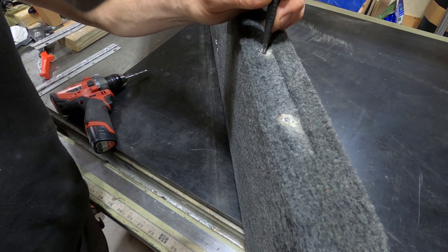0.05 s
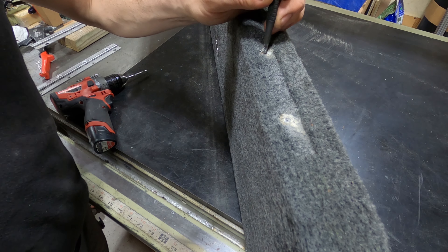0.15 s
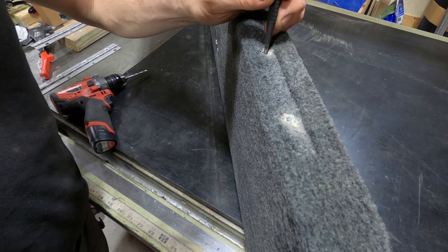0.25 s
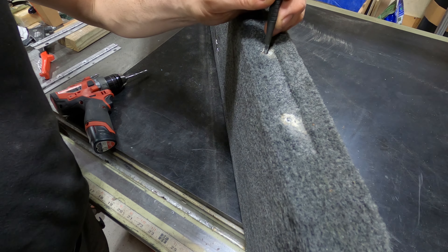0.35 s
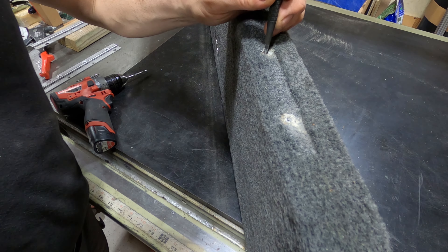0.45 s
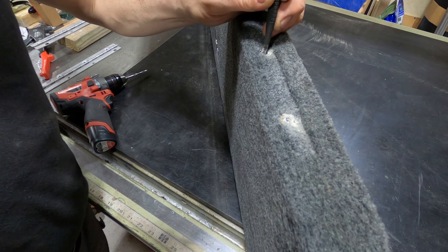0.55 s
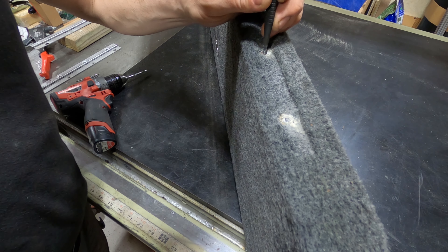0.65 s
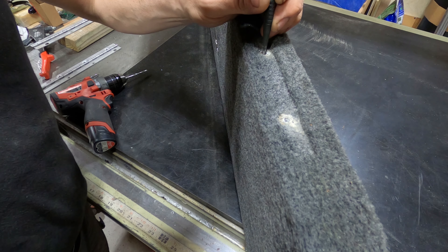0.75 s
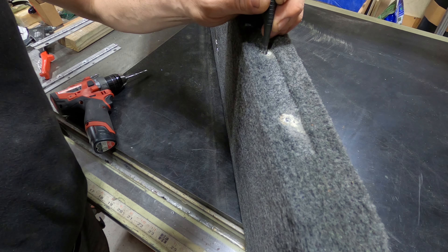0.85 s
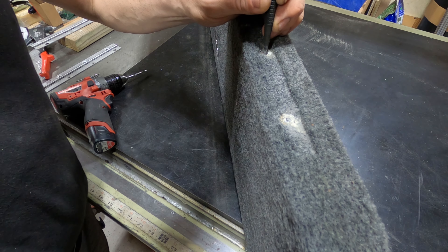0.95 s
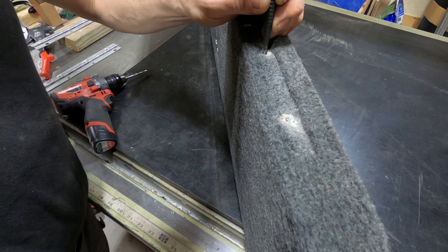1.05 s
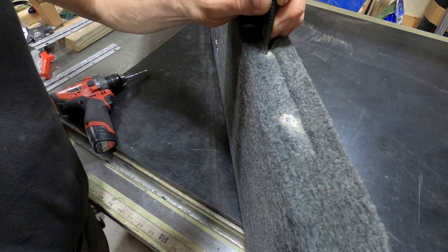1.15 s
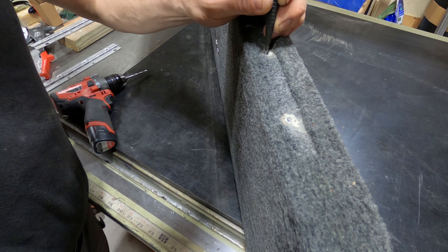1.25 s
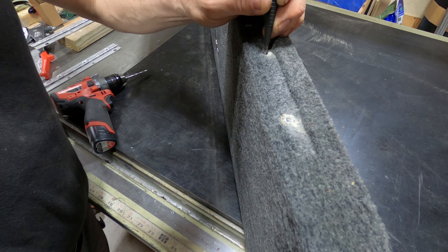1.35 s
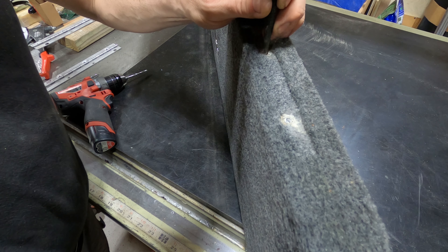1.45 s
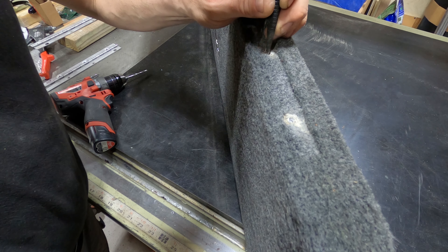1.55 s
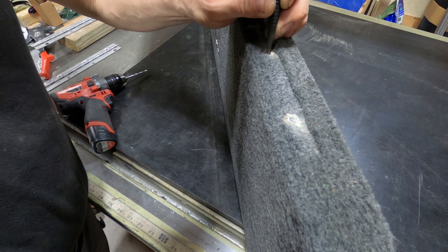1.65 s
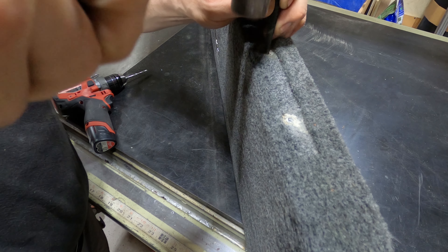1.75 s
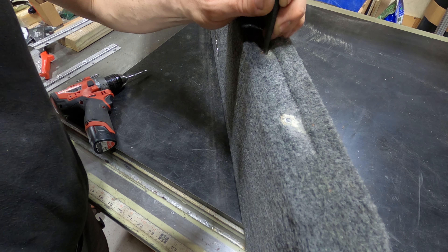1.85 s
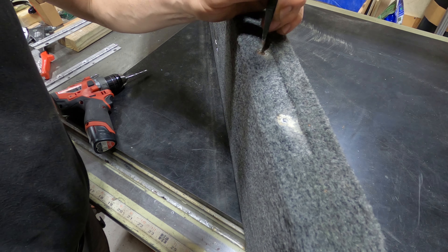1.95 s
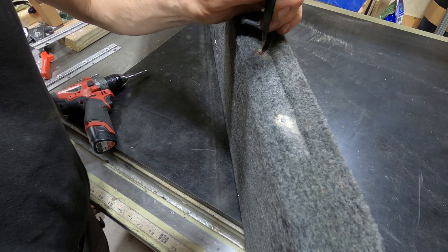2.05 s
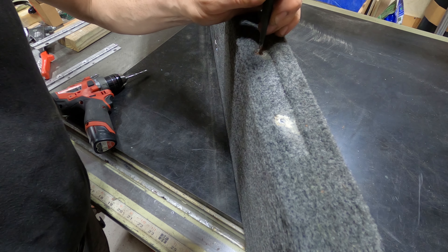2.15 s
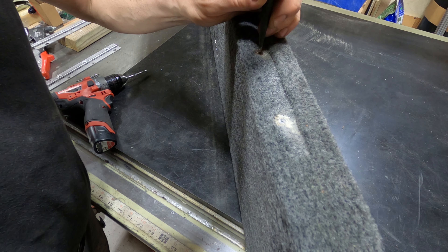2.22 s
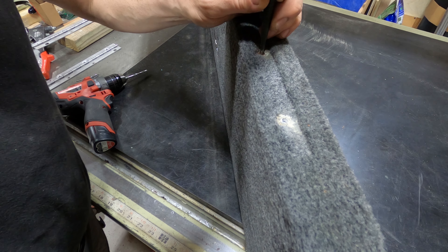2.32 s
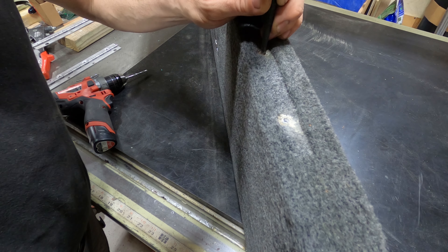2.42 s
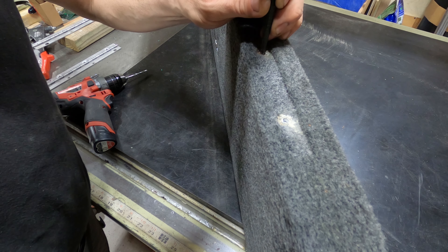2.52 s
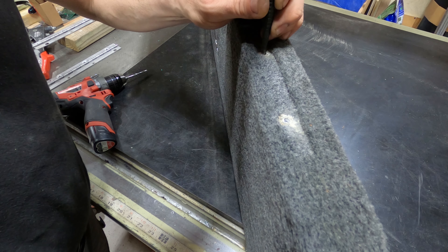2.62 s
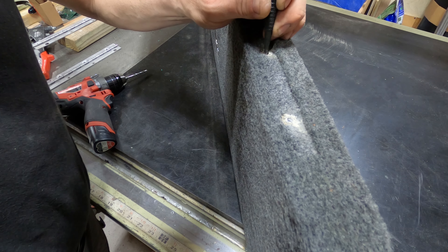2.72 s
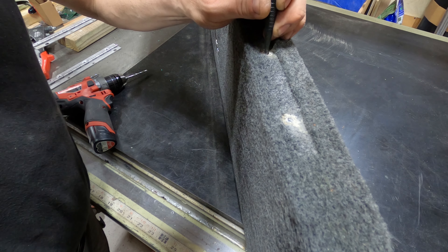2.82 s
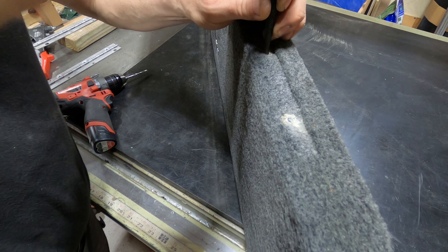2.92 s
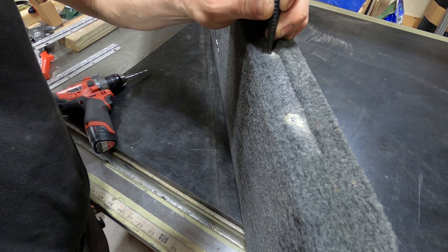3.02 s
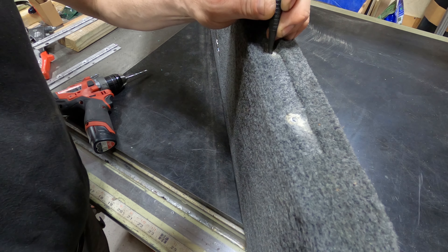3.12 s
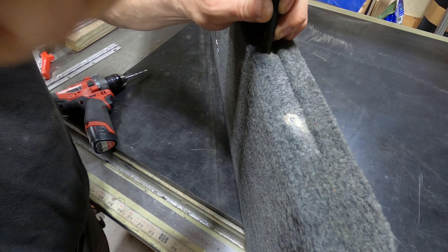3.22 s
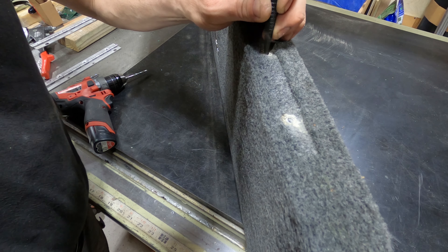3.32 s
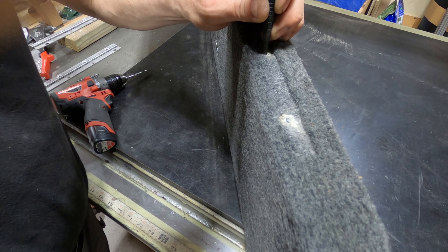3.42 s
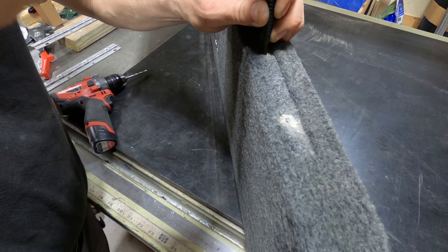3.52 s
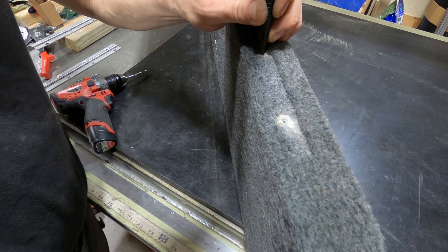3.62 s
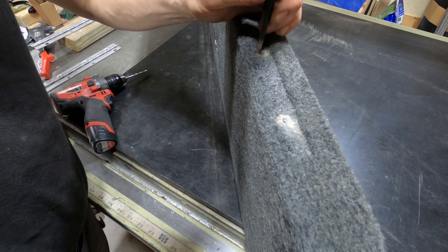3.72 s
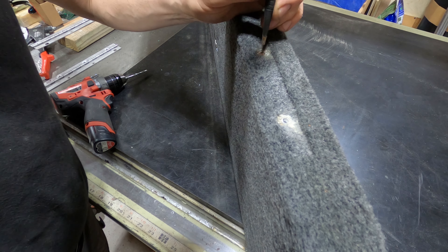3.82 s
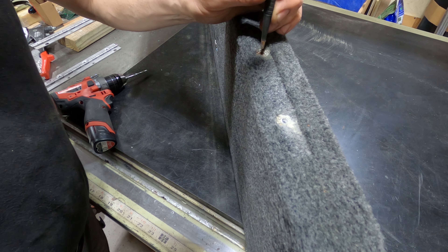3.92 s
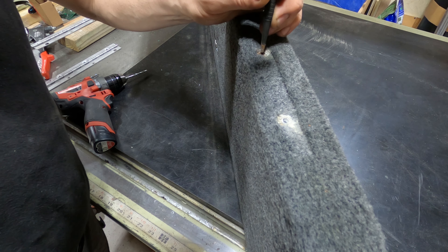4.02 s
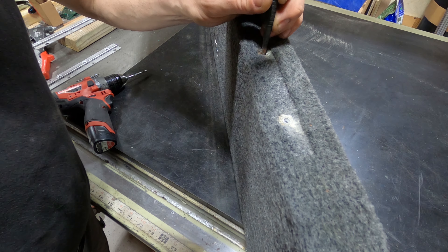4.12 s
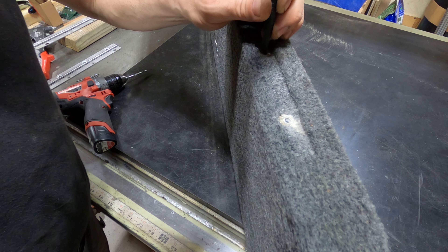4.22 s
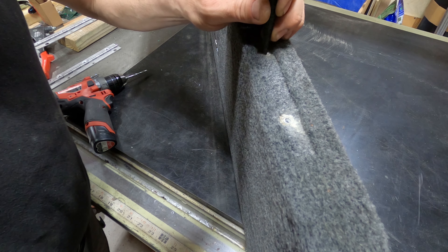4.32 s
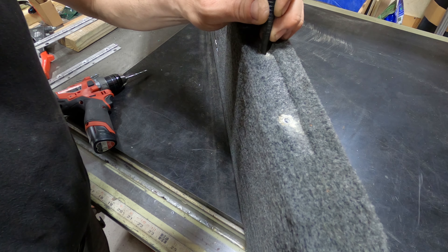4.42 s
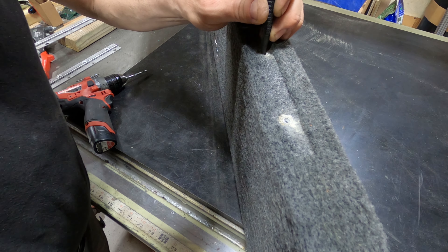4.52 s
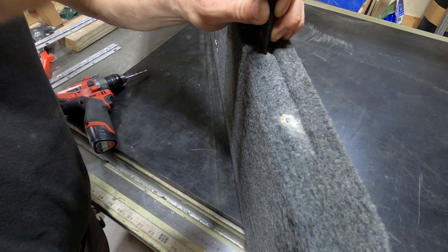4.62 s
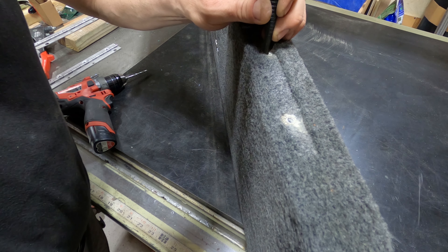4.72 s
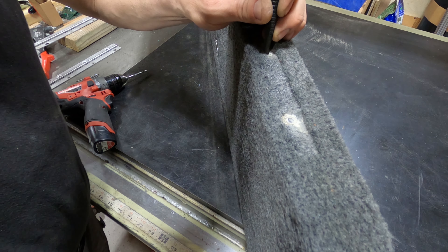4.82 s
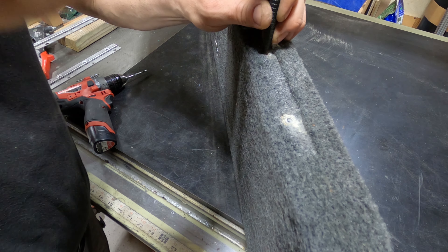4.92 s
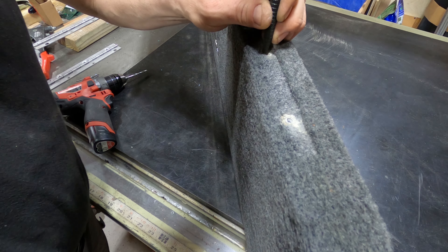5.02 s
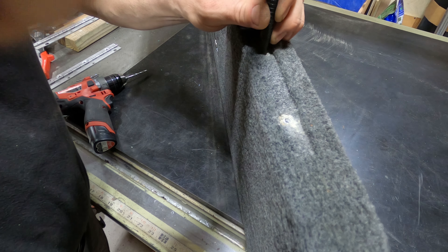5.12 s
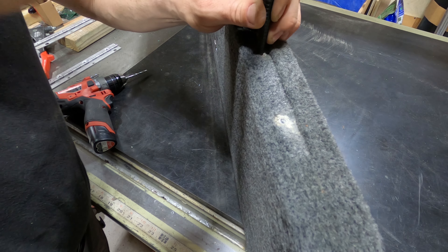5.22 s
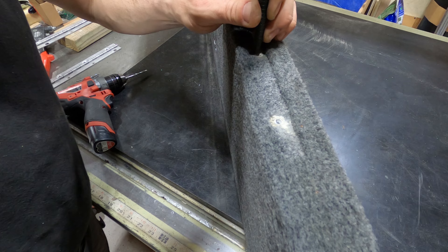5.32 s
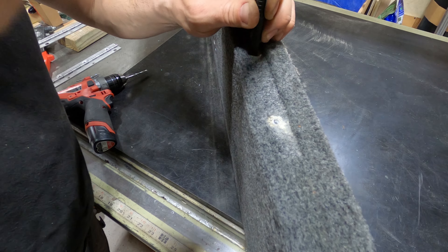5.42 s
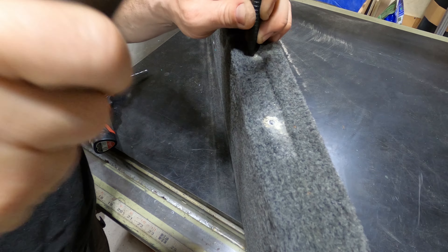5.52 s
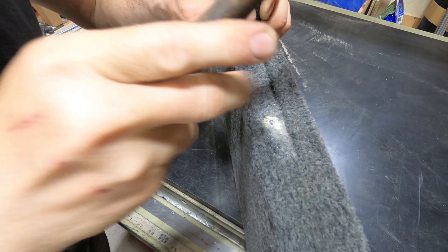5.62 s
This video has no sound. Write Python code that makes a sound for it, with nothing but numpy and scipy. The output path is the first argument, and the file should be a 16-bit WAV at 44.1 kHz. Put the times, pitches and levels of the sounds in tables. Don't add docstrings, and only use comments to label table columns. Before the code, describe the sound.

Nine sharp steel taps, three at a time, with dull hull boom and brief room hiss, quiet scrapes and ticks between the sets.

```python
import sys
import numpy as np
from scipy import signal
from scipy.fft import rfft, irfft, next_fast_len
from scipy.io import wavfile
from scipy.ndimage import uniform_filter1d

SR = 44100
rng = np.random.default_rng(int(sys.argv[2]) if len(sys.argv) > 2 else 0)


def master(y):
    cut = np.clip(np.atleast_2d(y).T, -1, 1)
    pcm = np.round(cut * 32767)
    wavfile.write(sys.argv[1], SR, pcm.astype(np.int16))


def level_to_linear(level):
    exponent = np.asarray(level, float) / 20
    return 10 ** exponent


N = 249591
HOP_S = 512 / 48000

# [t/s, crack peak level/dB, lid knock level/dB, shank ring level/dB, shank ring f/Hz]
BLOWS = [
    (1.211, -4.5, 1.5, 0.5, 7450),
    (1.5344, 0.5, -6.5, -8.5, 7944),
    (1.8261, 0.5, 0, -10.5, 8060),
    (3.017, -1.5, 3.5, 15, 7813),
    (3.3343, 0.5, 2.5, 8.5, 7840),
    (3.5742, 2, -2.5, 3, 6894),
    (4.7066, 1, 5.5, 5, 8455),
    (5.006, 2.5, -4.5, -9.5, 9160),
    (5.2747, 0, -6.5, -5, 8450),
]
# [head ring f/Hz, head ring level/dB, room level/dB, hand damping of the lid, room brightness/dB per octave]
GRIPS = [
    (2600, -7, -25, 1.02, 0.47),
    (3610, -0.1, -21.5, 0.75, 0.82),
    (2890, 13, -20.5, 0.86, -1.57),
]
# [place/hops, smear level/dB, first early copy level/dB]
LEADS = [(1.12, -19.5, -18.5), (1.34, -29, -14.5), (1.55, -42, -18.5)]
# [f/Hz, level/dB per Hz]
CRACK_COLOUR = [(410, -25.5), (700, 3), (1460, -5.5), (3110, -3), (3890, 1.5), (5690, -7), (7030, -5.5),
                (9400, -8), (10400, -21.5), (12200, -13.5), (16400, -43)]
# [f/Hz, level/dB, t60/s]
HULL_MODES = [(49.03, -16, 1), (57.3, 5.5, 0.36), (71.6, -0.5, 0.51), (106.7, -2.5, .3), (132.7, 4, 0.33),
              (145.66, -6, 0.58), (206, -9, 0.48), (232.2, -4, 0.33), (263, -1.5, 0.05), (320.6, -13, 0.44),
              (368.5, -7.5, 0.3), (419.4, -6, 0.13), (488, -7, 0.043), (516, -26.5, 0.45), (606, -22, 0.29),
              (757.3, -19.5, 0.17)]
# [f/Hz, level/dB per Hz]
ROOM_COLOUR = [(150, -20), (250, -6.5), (374, -8.5), (469, -10), (1050, -22), (1270, -17.5), (1840, -26.5),
               (2890, -23), (6820, -31.5), (8120, -30.5), (13000, -40), (14700, -47.5), (16400, -109)]
# [f/Hz, t60/s]
ROOM_DECAY = [(300, 0.41), (1000, 0.27), (3000, 0.4), (8000, 0.46), (12000, 0.29), (14500, .4)]
# [t/s, knock rms level/dB, thud level/dB, t60/s]
REBOUNDS = [
    (1.243, -32, -25, .06),
    (3.703, -37, -24.5, 0.28),
    (3.801, -50.5, -47, 0.36),
    (4.822, -35.5, -24.5, 0.27),
    (5.127, -32, -26, 0.27),
    (5.386, -37.5, -34, 0.21),
]
# [t/s, knock level/dB, thud level relative to the knock/dB, click level relative to
# the knock/dB, knock t60/s]
TOUCHES = [(0.109, -58, -19, -6, .03), (0.417, -62, -7, -30, .03), (0.514, -87, -8, 13, 0.092),
           (0.541, -86, -7, 12, 0.07), (0.616, -72, -13, 23.5, 0.17), (0.667, -42, -16, -18, 0.048),
           (0.804, -50, -27, -16, 0.031), (0.85, -36, -13, -28, 0.093), (2.545, -66.5, 10.5, -20, .1),
           (2.616, -49.5, 0, -35, 0.14), (4.385, -37, -9, -16, 0.038), (4.473, -63, -7, -16, 0.12)]
# [start t/s, end t/s, scrape level at the end/dB, swell level/dB, rub level at the end/dB]
DRAGS = [
    (0.0, 0.004, -65.5, 18, -94),
    (0.105, 0.312, -69, -0.5, -73.5),
    (0.61, 0.815, -65.5, 4, -84),
]
# [start t/s, end t/s, scrape level at the end/dB, swell level/dB, rub level at the end/dB]
SEATS = [
    (2.48, 2.62, -65.5, 35, -70),
    (4.22, 4.39, -58.5, 40, -60.5),
]
# [f/Hz, width/Hz, level/dB]
SCRAPE_MODES = [(2180, 840, 5.5), (3990, 730, 4), (6080, 1500, 6), (8860, 1200, -5)]
# [f/Hz, width/Hz, level/dB]
SEAT_MODES = [(2740, 230, 7.5), (3750, 600, 1.5), (8800, 250, -5)]
# [t/s, hull rumble level under shifting weight/dB, suppressor opening level/dB]
QUIET = [
    (0.0, -73, 2.5),
    (0.28, -68.5, -1),
    (0.46, -73, -1),
    (0.84, -67, 2.5),
    (1.17, -60, -1),
    (2.299, -75, -6),
    (2.95, -73, -3.5),
    (4.2, -75.5, -0.5),
    (4.66, -65, -2.5),
]
# [f/Hz, level/dB per Hz]
RUMBLE_COLOUR = [(12, -22), (24, 6.5), (45, 3.5), (70, -15.5), (100, -19.5), (130, -48)]
HUM_COLOUR = [(80, -40.5), (140, -0.5), (210, -2), (380, -9.5), (520, -15), (800, -56)]
HISS_COLOUR = [(450, -34.5), (700, -1), (1400, 1.5), (2000, -8), (4000, -16.5), (9500, -28), (10500, -35),
               (12000, -56), (16400, -90.5)]
# [level/dB, fall/dB per s]
AFTER = [(-39.5, 63), (-39.5, 74), (-52.5, 81.5)]
# [f/Hz, side over mid level/dB]
SIDE_COLOUR = [(60, -20), (500, -9.5), (2000, -8.5), (8000, -2), (11000, -6), (12000, -2.5), (15000, -11.5)]
# [t/s, width level/dB]
WIDTH = [
    (0, 5),
    (1.15, 3.5),
    (1.851, -1.5),
    (1.9, -6),
    (2.199, -17.5),
    (4.6, -16),
    (4.9, -11.5),
    (5.05, -12.5),
    (5.66, -5),
]
# [f/Hz, level/dB per Hz]
KNOCK_COLOUR = [(300, -57.5), (700, -30), (1450, 14), (2000, 2), (2900, 3.5), (4000, -11), (6000, -120)]
CLICK_COLOUR = [(2000, -120), (2800, -53), (3800, 12.0), (5000, 19), (6000, -8), (9000, 5), (11000, -38),
                (13000, -120)]
DRAG_COLOUR = [(1200, -26), (1800, 7.5), (10000, 1.0), (12500, 6), (14000, -120)]
RUB_COLOUR = [(200, -18), (400, 4.5), (1400, -4.5), (2000, -5.5), (3000, -59)]
REBOUND_COLOUR = [(150, -41.5), (350, 4.5), (700, -7.0), (1100, -6.0), (1700, -12), (2100, -19.0), (3600, -16.5),
                  (5000, -31), (7000, -120)]


def unit(x):
    return x / np.sqrt(np.mean(x ** 2) + 1e-20)


def along(points, hz):
    f, v = np.transpose(points)
    return np.interp(np.log(hz + 1), np.log(f + 1), v)


def filtered(x, response):
    m = next_fast_len(x.shape[-1] + 4096)
    spectrum = rfft(x, m) * response(np.fft.rfftfreq(m, 1 / SR))
    return irfft(spectrum, m)[..., :x.shape[-1]]


def peak(f, hz, width_hz):
    return 1j * f * width_hz / (hz * hz - f * f + 1j * f * width_hz)


def noise(count, colour):
    white = rng.standard_normal((2, count))
    pair = filtered(white, lambda f: level_to_linear(along(colour, f) + [0 * f, along(SIDE_COLOUR, f)]))
    return pair / np.sqrt(np.mean(pair[0] ** 2))


def add(out, x, s):
    part = out[:, round(s * SR):][:, :x.shape[-1]]
    part += x[..., :part.shape[1]]


def patchy(x, depth_db, size):
    z = signal.stft(x, nperseg=1024)[2]
    field = uniform_filter1d(rng.standard_normal(z.shape[1:]), size[0], axis=0)
    field = uniform_filter1d(field, size[1], axis=1)
    return signal.istft(z * level_to_linear(depth_db * unit(field)), nperseg=1024)[1][:, :N]


def shop():
    hum_db, hiss_db, hiss_depth = -70, -78, 2.3
    t = np.arange(N + 1024) / SR
    s, rumble_db, open_db = np.transpose(QUIET)
    open_db = np.interp(t, s, open_db)
    rest = np.interp(t, s, rumble_db), hum_db + open_db, hiss_db + hiss_depth * open_db
    hits = np.r_[-9, np.transpose(BLOWS)[0]]
    since = t - hits[np.searchsorted(hits, t) - 1]
    x = 0
    for db, (after_db, fall), colour in zip(rest, AFTER, (RUMBLE_COLOUR, HUM_COLOUR, HISS_COLOUR)):
        x = x + np.hypot(level_to_linear(db), level_to_linear(after_db - fall * since)) * noise(len(t), colour)
    return patchy(x, 2.8, size=(3, 6))


def slides():
    start_s, rub_slope, rub_under_db = 0.02, 150, -30
    out, t = np.zeros((2, N)), np.arange(N) / SR
    grain = level_to_linear(1.5 * unit(uniform_filter1d(rng.standard_normal(N), 150)))
    raw = patchy(noise(N, DRAG_COLOUR) * grain, 3.7, size=(7, 6))
    rub = noise(N, RUB_COLOUR)
    for rows, modes, valley, stop in ((DRAGS, SCRAPE_MODES, .22, 260), (SEATS, SEAT_MODES, .16, 1100)):
        scrape = filtered(raw, lambda f: valley + sum(level_to_linear(db) * np.abs(peak(f, hz, w)) ** 2 for hz, w, db in modes))
        scrape = scrape / np.std(scrape[0])
        for start, end, db, swell_db, rub_db in rows:
            moving = np.clip((t - start) / start_s + (start < start_s), 0, 1)
            to_go = np.clip((end - t) / (end - start), 0, 1)
            level = moving * level_to_linear(db - swell_db * to_go - stop * np.maximum(t - end, 0))
            rubbing = level_to_linear(rub_under_db) * level + moving * level_to_linear(rub_db - rub_slope * np.abs(t - end))
            out += level * scrape + rubbing * rub
    return out


def boom(t, spread_db, damp, knock_db, panel_db=0):
    hz, db, t60 = np.transpose(HULL_MODES)[:, :, None]
    chance = rng.standard_normal((2, len(HULL_MODES), 1))
    db = db + spread_db * chance[0] + knock_db * np.clip(np.log2(hz / 200), 0, 1)
    face = np.where((hz > 100) & (hz < 170), -1, 1)
    db = db + panel_db * ((hz > 100) & (hz < 250))
    t = np.maximum(t - .23 / hz, 0)
    rise = 1 - np.exp(-t * hz / 0.13)
    decay = level_to_linear(db - 60 * t * np.where(hz > 100, damp, 1) / t60)
    tone = np.sin(2 * np.pi * hz * (1 + 0.016 * chance[1]) * t)
    return np.sum(face * rise * decay * tone, axis=0)


def thud(t, spread_db, damp, knock_db):
    return filtered(boom(t, spread_db, damp, knock_db), lambda f: f / (f + 300)) * [[1], [.05]]


def touches():
    out, t = np.zeros((2, N)), np.arange(round(.2 * SR)) / SR
    for s, db, thud_db, click_db, t60 in TOUCHES:
        snap = (1 - np.exp(-t / .0003)) * level_to_linear(-60 * t / .012)
        knock = (snap + level_to_linear(-29.0 - 60 * t / max(t60, .01))) * noise(len(t), KNOCK_COLOUR)
        click = (snap + level_to_linear(-11 - 60 * t / 0.098)) * noise(len(t), CLICK_COLOUR)
        add(out, level_to_linear(db - 2.5) * (knock + level_to_linear(click_db) * click), s)
        add(out, level_to_linear(db + thud_db - 9.5) * thud(t, 5.7, 1.0, 11.0), s)
    return out


def crack_of_steel(t, db, wide_db, head, shank):
    def rings(f):
        ringing = 1 + level_to_linear(head[1]) * peak(f, head[0], 700) + level_to_linear(shank[1]) * peak(f, shank[0], 520)
        return ringing * f * f / (f * f + 1100 ** 2)

    burst = filtered(noise(4000, CRACK_COLOUR), rings)[:, 2000:2700] * level_to_linear([[0], [wide_db + 2.5]])
    decay = level_to_linear(-60 * t / .0025) + level_to_linear(-5 - 60 * t / .0075) + level_to_linear(-26 - 60 * t / .04)
    crack = burst * (1 - np.exp(-t / .0003)) * decay
    crack = level_to_linear(db - 0.5) * crack / np.abs(crack[0]).max()
    top = filtered(crack[0], lambda f: np.clip(f / 2000 - 5, 0, 1))
    return crack - .5 * top * [[0], [1]]


def room(seconds, ring_hz, ring_db, bright_db):
    hz, t, z = signal.stft(noise(round(seconds * SR), ROOM_COLOUR), SR, nperseg=256)
    duck = 8 * np.exp(-t / 0.04)
    cut = 90 * t ** 2 * np.log(1 + hz / 1500)[:, None]
    fall = -60 * t / along(ROOM_DECAY, hz)[:, None] - duck - cut
    ring = 1 + level_to_linear(ring_db) * np.abs(peak(hz, ring_hz, 1200)) ** 2
    ring = ring * level_to_linear(bright_db * np.log2(hz / 3000 + 0.14))
    hiss = signal.istft(z * level_to_linear(fall) * ring[:, None], SR, nperseg=256)[1]
    return filtered(hiss, lambda f: np.clip((15600 - f) / 2500, 0, 1))


def smear(leaks):
    t = np.arange(round(4 * HOP_S * SR)) / SR - 4 * HOP_S
    hz, db = np.transpose(leaks)
    crowd = rng.uniform(450, 13000, size=36)
    crowd_db = along(CRACK_COLOUR, crowd) + rng.normal(-9, 3.2, size=36) - 8 * (crowd < 2500)
    db, hz = np.r_[db, crowd_db], np.r_[hz, crowd][:, None]
    turn = rng.random((2, len(hz), 1))
    swell = 1 + 0.28 * np.cos(2 * np.pi * (t / HOP_S + turn[0]))
    lines = level_to_linear(db) @ (swell * np.sin(2 * np.pi * (hz * t + turn[1])))
    return unit(lines) * level_to_linear(995 * t - 5200 * t ** 2)


def hammer():
    boom_db = -17.8
    out, t = np.zeros((2, N)), np.arange(round(.6 * SR)) / SR
    short, fifth = t[:700], t[:SR // 5]
    place, *lead = np.transpose(LEADS)
    for blow, (s, db, knock_db, shank_db, shank_hz) in enumerate(BLOWS):
        head_hz, head_db, room_db, damp, bright_db = GRIPS[blow // 3]
        room_db += 0.22 * min(knock_db, 0)
        wide_db = -5 - 1.1 * knock_db
        bright_db -= .12 * shank_db
        panel_db = -0.9 if blow else -9
        smear_db, copy_db = (np.interp(s / HOP_S % 2, place, column) for column in lead)

        crack = crack_of_steel(short, db, wide_db, (head_hz, head_db), (shank_hz, shank_db))
        low = level_to_linear(boom_db - 2) * boom(t, 2.5, damp, knock_db * np.exp(-t / 0.19), panel_db)
        dent = t / 0.0015 * level_to_linear(-60 * t / 0.015) * np.cos(2 * np.pi * 400 * t)
        low += level_to_linear(boom_db + knock_db + 9.5) * dent
        sway = level_to_linear(boom_db + wide_db - 17.0) * level_to_linear(-60 * fifth / .25) * boom(fifth, 5, 1.6, 3)
        add(out, crack, s + .0008)
        add(out[:1], low, s + 0.0017)
        add(out[1:], sway, s + 0.0017)
        add(out, level_to_linear(room_db) * room(.55, shank_hz, 0.51 * shank_db, bright_db), s + .003)

        leak = smear([(shank_hz, 0.4 * shank_db), (1.1 * head_hz, -4.5)])
        add(out, level_to_linear(db + smear_db) * leak * [[1], [0]], s + 0.00055 - 4 * HOP_S)
        early = crack + 2.5 * low[:700] * level_to_linear(-60 * short / .02) * [[1], [0]]
        for k in range(1, 5):
            add(out, early * level_to_linear(copy_db - 14 * (k - 1)), s + .0008 - k * HOP_S)
    return out


def rebounds():
    out, t = np.zeros((2, N)), np.arange(round(.25 * SR)) / SR
    for s, knock_db, thud_db, t60 in REBOUNDS:
        shape = (1 - np.exp(-t / .0008)) * (level_to_linear(-60 * t / t60) + 0.27 * level_to_linear(-60 * t / 0.015))
        add(out, level_to_linear(knock_db) * shape * noise(len(t), REBOUND_COLOUR), s)
        add(out, level_to_linear(thud_db) * thud(t, 4.5, 1.57, 9.4), s + 0.002)
    return out


def gate(x):
    gate_db, soft_db, gate_hz = -103, 8, 10300
    hz, _, z = signal.stft(x, SR, nperseg=512)
    power = uniform_filter1d(np.mean(np.abs(z) ** 2, axis=0), size=9, axis=0)
    power = uniform_filter1d(power, size=5, axis=1)
    passed = np.clip((10 * np.log10(np.abs(power) + 1e-20) - gate_db) / soft_db, 0, 1)
    spared = np.clip((gate_hz - hz) / 1500, 0, 1)[:, None]
    return signal.istft(z * np.maximum(passed, spared), SR, nperseg=512)[1][:, :N]


def scene():
    mid, side = shop() + slides() + touches() + hammer() + rebounds()
    s, body_db = np.transpose(WIDTH)
    low_db = -4.5 + 2.2 * body_db
    low, under = filtered(side, lambda f: np.clip([2 - f / 600, 14.5 - f / 800], 0, 1))
    body = under - low
    t = np.arange(N) / SR
    side = side + (level_to_linear(np.interp(t, s, low_db)) - 1) * low + (level_to_linear(np.interp(t, s, body_db)) - 1) * body
    return np.array([mid + side, mid - side])


def top_cut(x):
    return signal.sosfilt(signal.butter(12, 16500, fs=SR, output="sos"), x)


def record(dry):
    x = filtered(gate(dry), lambda f: (1j * f) ** 2 / (40 ** 2 - f * f + 1j * f * 45))
    x = 0.99 * x / (1 + np.abs(x) ** 8) ** (1 / 8)
    x = filtered(x, lambda f: np.clip((16600 - f) / 500, 0, 1))
    return top_cut(x)


dry = scene()
out = record(dry)
master(out)
```